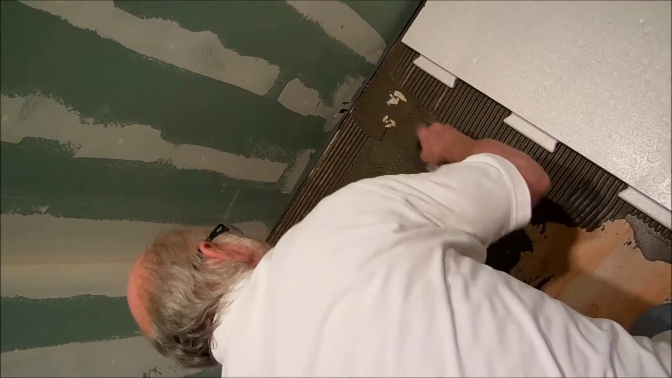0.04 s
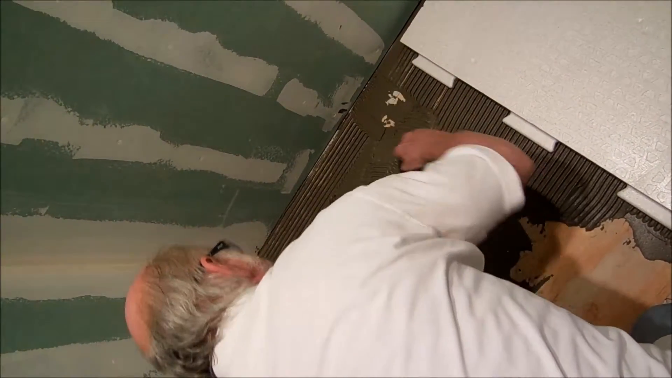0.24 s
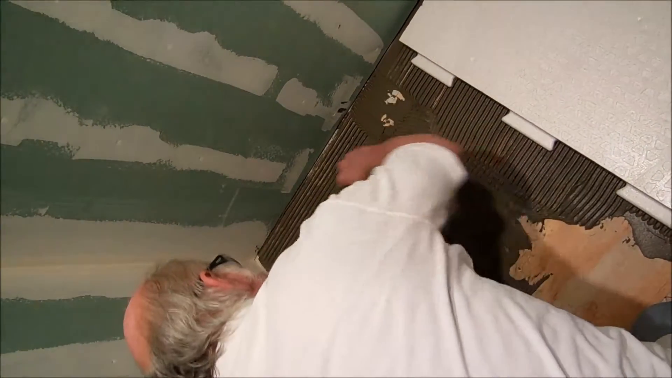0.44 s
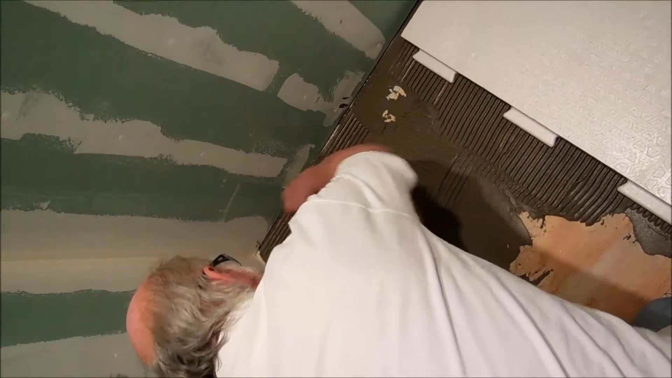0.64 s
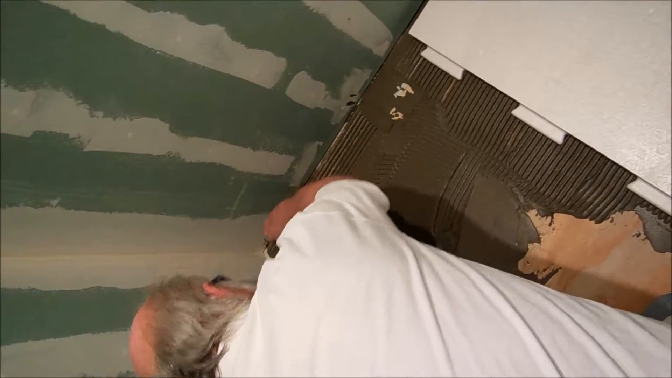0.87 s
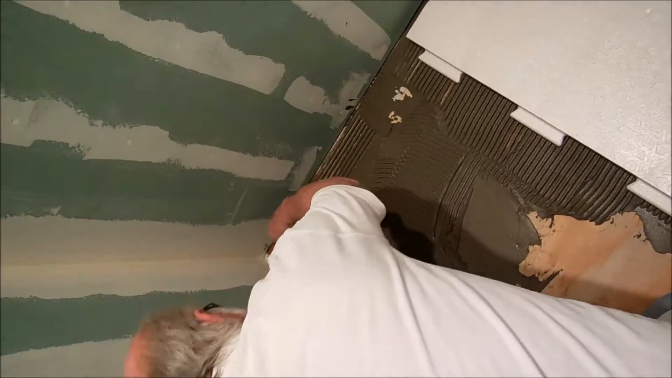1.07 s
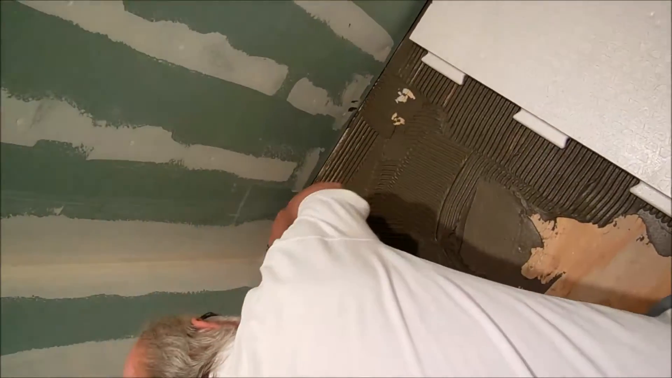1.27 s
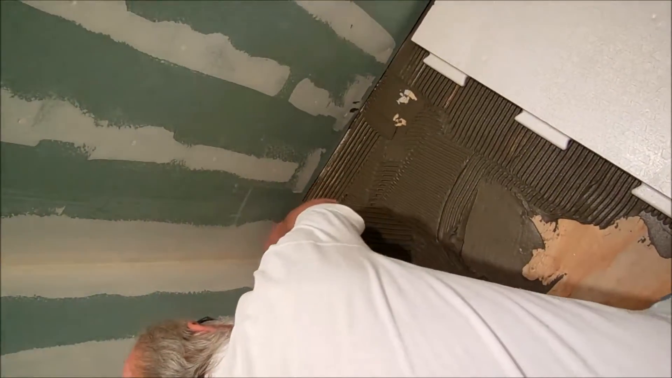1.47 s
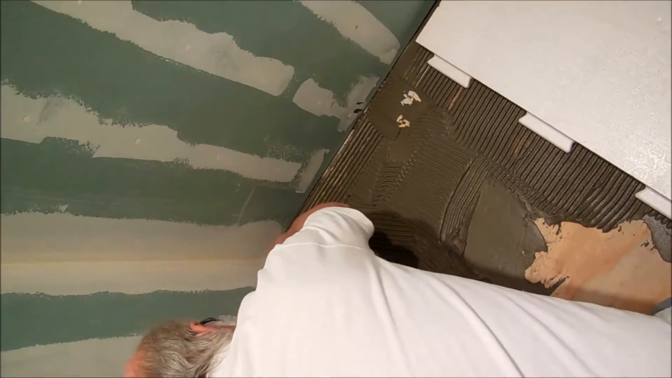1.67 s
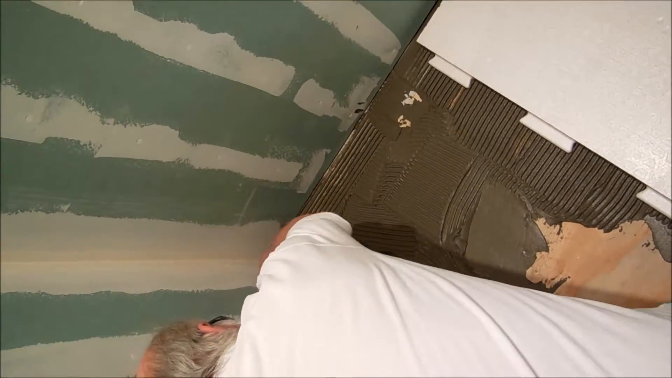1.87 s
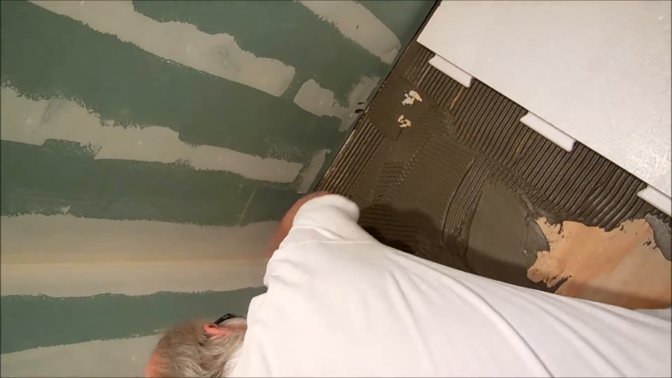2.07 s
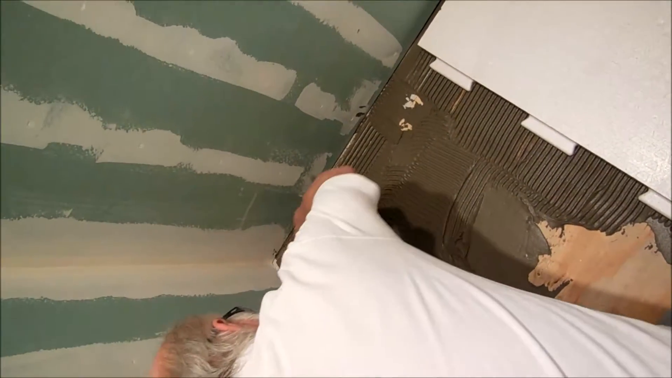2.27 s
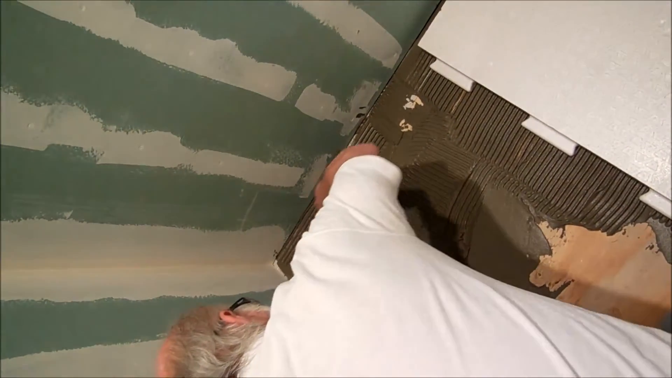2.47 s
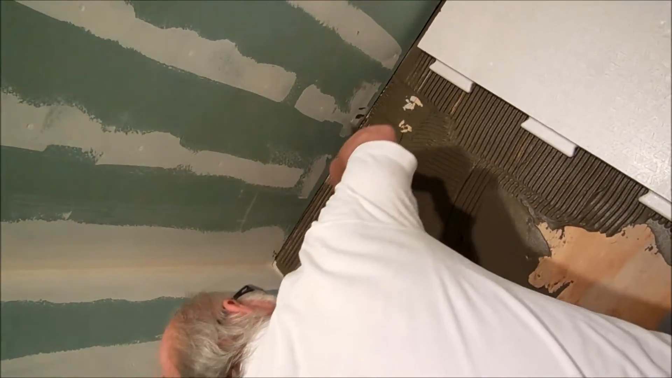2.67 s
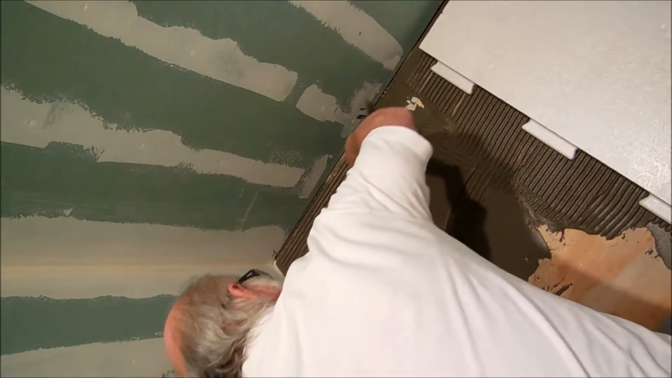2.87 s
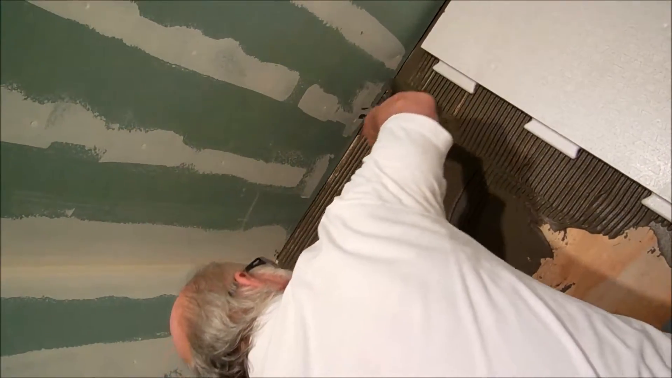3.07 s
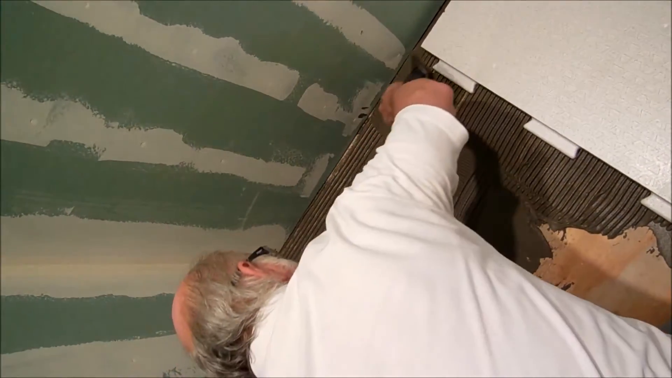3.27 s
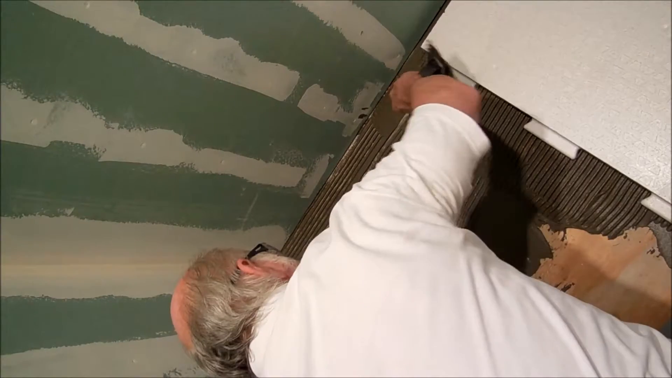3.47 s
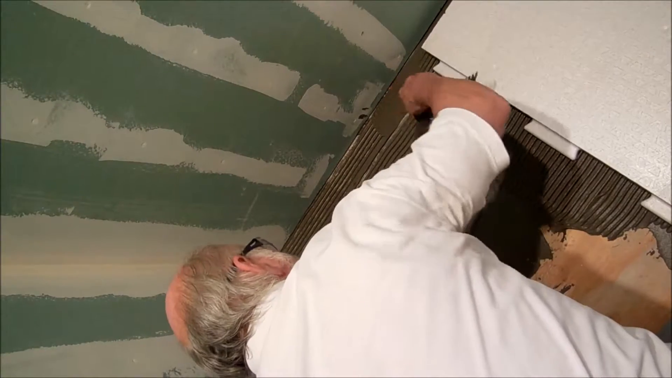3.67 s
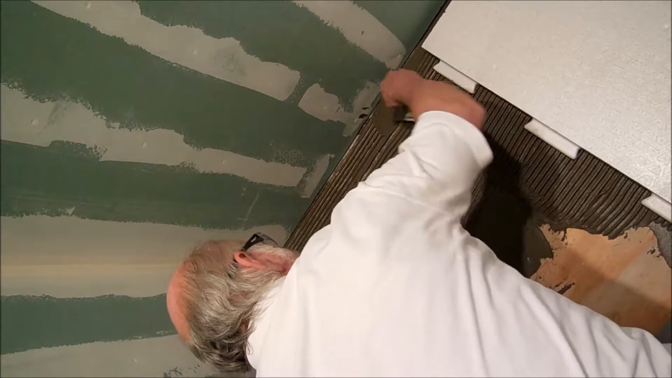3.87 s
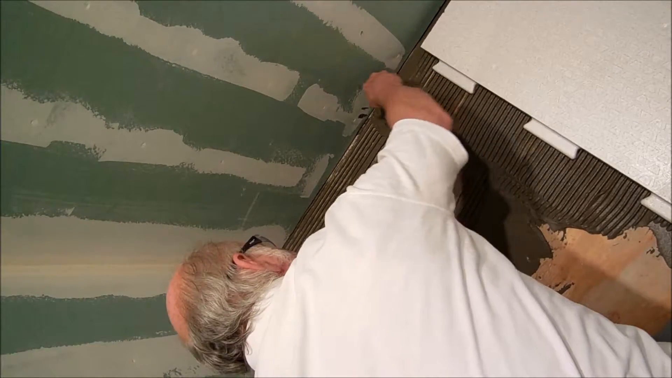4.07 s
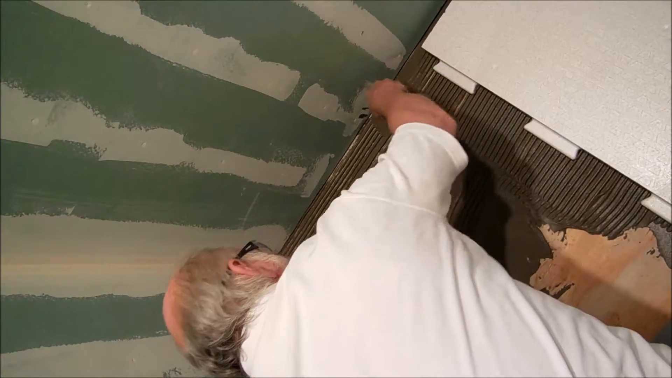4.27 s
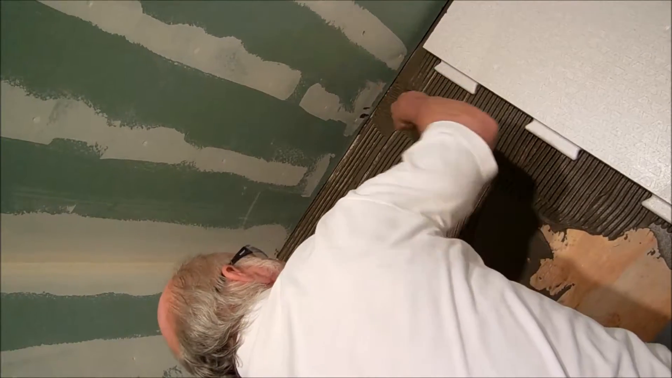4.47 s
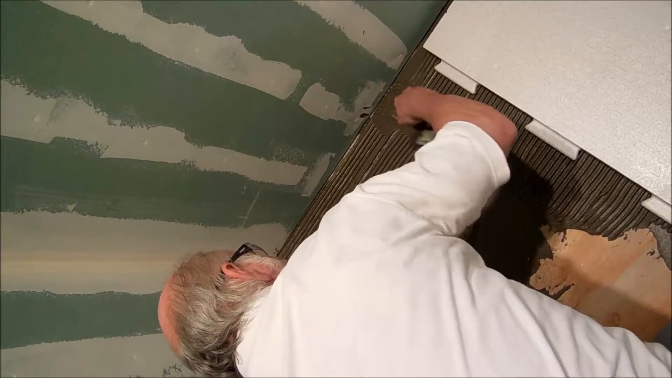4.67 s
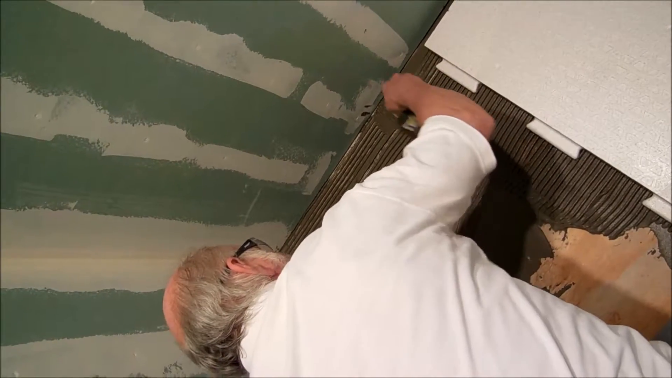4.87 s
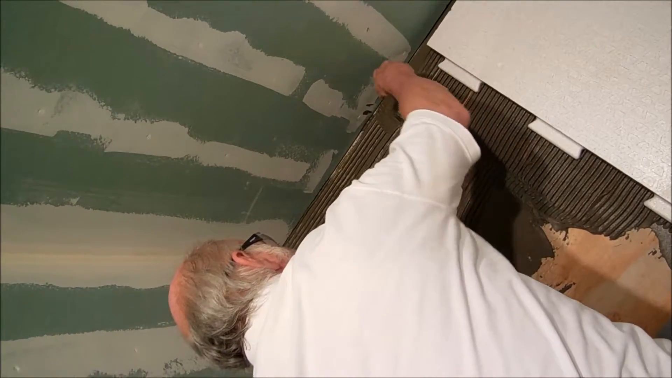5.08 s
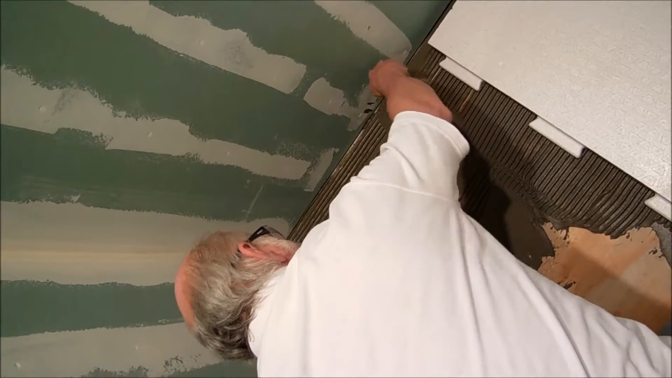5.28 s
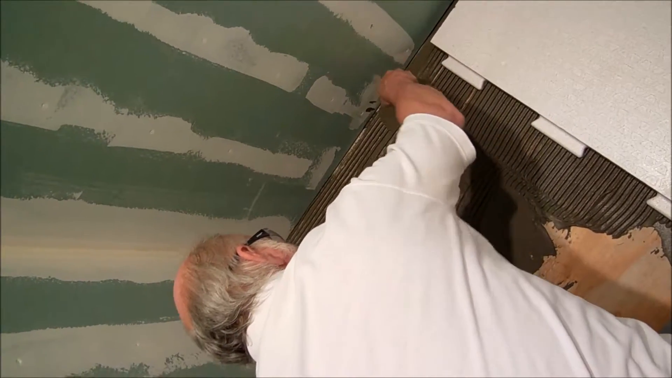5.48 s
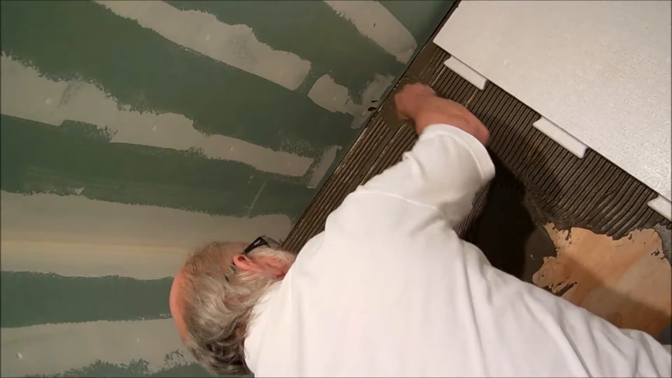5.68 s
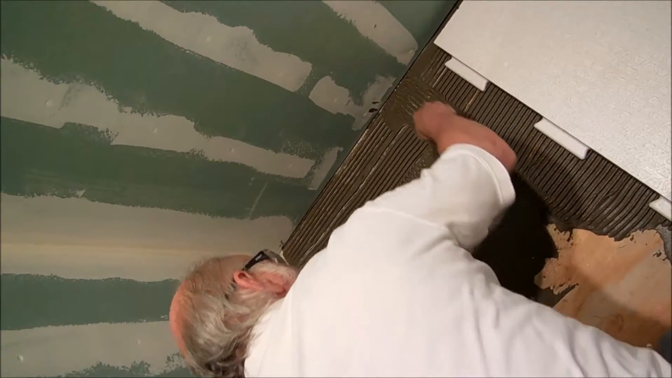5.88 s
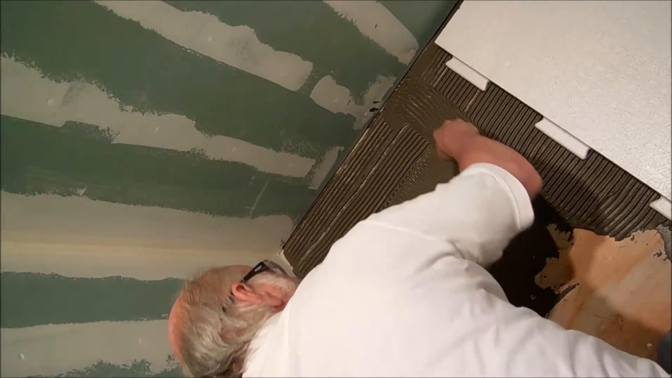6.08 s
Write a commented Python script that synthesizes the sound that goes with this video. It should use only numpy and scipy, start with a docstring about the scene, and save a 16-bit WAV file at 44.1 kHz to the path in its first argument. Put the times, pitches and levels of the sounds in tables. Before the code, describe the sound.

A notched trowel rasps through gritty mortar in one long scrape, with short clicks, pauses and a closing scrape in a small bare stall.

```python
"""A notched steel trowel combs sandy mortar over a wooden subfloor in a bare shower stall.
Sand crushed under the teeth hisses, made of random clicks; the same kind of clicks, sent
through resonances, make the blade rasp and the floor drum. Between strokes the blade skims
the wet surface as soft noise and touches down in short bursts. Small pops, a soft thud,
the ringing of the close walls and quiet room air complete the scene."""
import sys
import numpy as np
from scipy import signal
from scipy.fft import rfft, irfft, next_fast_len
from scipy.io import wavfile
from scipy.ndimage import map_coordinates

SR = 44100
rng = np.random.default_rng(int(sys.argv[2]) if len(sys.argv) > 2 else 0)


def to_wav(s):
    """Save 16-bit WAV."""
    ch = np.atleast_2d(s).T  # columns
    pcm = np.round(np.clip(ch, -1, 1) * 32767)  # PCM
    wavfile.write(sys.argv[1], SR, pcm.astype(np.int16))


N = 270333

# Levels of events are set before the layers are balanced and the walls answer.
# Strokes of the trowel. Each row: start in seconds, length in seconds, crushed sand in dB,
# drag on the floor in dB, blade rasp in dB, easing off in dB per second.
STROKES = [(-.04, 0.051, -21, -32.5, -25.5, 2), (1.963, 0.072, -37.5, -48.5, -42, 24),
           (2.06, 1.307, -32, -36, -47, 2.5), (3.386, 0.072, -37.5, -38.5, -66, 7),
           (3.48, 0.052, -33.5, -34, -67, 0), (4.321, 0.18, -23.5, -28.5, -34.5, 0.5),
           (5.504, 1, -32.5, -37, -52.5, 4)]
# Thicker heaps that the teeth plough through. Each row: middle in seconds, spread in seconds,
# extra sand in dB, extra drag in dB.
HEAPS = [(2.069, 0.022, 14.5, 2.5), (2.126, 0.029, 7, 10), (2.39, 0.022, 4, 5), (2.694, 0.015, 5, 2),
         (2.75, 0.0096, 4.5, 5.5), (3.012, 0.03, 7.5, 5.5), (3.106, 0.01, 4, 5.5), (5.6, 0.041, 7.5, 8),
         (5.702, 0.027, 8, 12), (5.824, 0.018, 3.5, 8.5), (6, 0.039, 2, 1)]
# Light passes over the wet surface. Each row: start in seconds, length in seconds,
# level in dB, brightness in dB per octave.
SKIMS = [(.45, 0.35, -59.5, -1), (1.349, 0.035, -52.5, 3.5), (1.885, 0.042, -47.5, 6)]
# The blade touches down. Each row: time in seconds, tick in dB, knock in dB.
TOUCHES = [(1.002, -54, -58), (1.916, -75, -46.5), (1.99, -54, -52), (2.442, -43, -35),
           (4.289, -47.5, -51.5), (4.323, -31.5, -51), (4.492, -32, -34), (5.48, -44, -48),
           (5.527, -41, -48)]
# The teeth chatter at one pitch of blade or board. Each row: middle in seconds,
# spread in seconds, pitch in Hz, level in dB over the drag.
CHATTER = [(2.236, .043, 396, -2), (2.56, 0.23, 1030, -6.5), (3.1, 0.076, 830, -3), (4.414, 0.048, 530, -4),
           (4.493, 0.024, 860, -2), (5.648, 0.075, 1250, -3.5)]

# Tone of crushed sand. Each row: frequency in Hz, relative level in dB per Hz.
SAND_SPECTRUM = [(150, -19.5), (600, -4.5), (1500, -2), (2800, -1), (4000, -1), (5500, -3), (8000, -1.5),
                 (10500, 0), (14500, -1.5), (16000, -6.5)]
# Broad tone of the damped board. Each row: frequency in Hz, relative level in dB per Hz.
BOARD_SPECTRUM = [(40, -47.5), (100, -36), (145, -6), (200, -14), (300, -3.5), (500, 1.5), (850, -7),
                  (1300, -11), (2200, -27.5), (5000, -44)]
# Tone of the wet surface before brightening. Each row: frequency in Hz, relative level in dB per Hz.
WET_SPECTRUM = [(300, -16), (2500, -14), (5500, -8.5), (8000, -9.5), (12000, -2.5), (14000, -10),
                (16000, -26)]
# Tone of still room air. Each row: frequency in Hz, relative level in dB per Hz.
AIR_SPECTRUM = [(12, -19), (20, -1), (44, 2.5), (65, -12), (285, -14), (642, -20), (1030, -19),
                (1570, -19.5), (3950, -25), (4300, -23.5), (16000, -24.5)]

# Resonances of the floor. Each row: frequency in Hz, width in Hz, relative level in dB.
FLOOR_MODES = [(153.5, 17.5, 1.5), (282, 21, 0), (354, 38, 0), (380, 71, -14.5), (535, 84, 3),
               (730, 57, 2.5), (800, 72, -13)]
# Resonances of the blade. Each row: frequency in Hz, width in Hz, relative level in dB.
BLADE_MODES = [(1150, 140, -2.5), (1333, 290, 2.5), (1716, 69, -25), (2000, 210, -9.5)]
# The whole blade flexing. Each row: frequency in Hz, width in Hz for one pass, level in dB.
RASP_MODE = [(1624, 1180, 0)]

# Fading of the late tail in the stall. Each row: frequency in Hz, seconds to fall by 60 dB.
STALL_FADE = [(120, 0.61), (400, 0.53), (800, 0.57), (1400, 0.66), (3000, 0.52), (6000, 0.56),
              (12000, 0.35)]
# Start of the late tail. Each row: frequency in Hz, level in dB against the early burst.
LATE_TAIL = [(150, -10.5), (500, -14.5), (1000, -11), (1700, -15), (3000, -15), (10000, -15.5)]
# Likeness of left and right. Each row: frequency in Hz, correlation from -1 to 1.
LIKENESS = [(30, 0.94), (60, 0.24), (130, 0.68), (300, 0.66), (600, 0.75), (1000, 0.44), (2000, 0.17),
            (4000, -0.13), (12000, -0.032)]
# Balance of the work between the sides. Each row: frequency in Hz, left minus right in dB.
SIDE_BALANCE = [(130, -1.5), (250, -1), (500, -3.5), (1000, -3.5), (4000, -5.5), (8000, -5.5),
                (10500, -5.5), (13000, -2), (16000, 2)]

# Time constants: sand cracks first, then the teeth sink to the floor; both stop as the blade lifts.
BITE_S, SINK_S, RELEASE_S = 0.027, 0.042, 0.014
SKIM_ATTACK_S, SKIM_RELEASE_S = 0.02, 0.021
RASP_GROWS = 1.46  # dB of rasp for each dB that a heap adds, averaged over sand and drag
CHATTER_Q = 5  # pitch over width, for one pass of the resonance
TOP_HZ = 16000


def amp(db):
    """Turn decibels into a gain."""
    return 10 ** (np.asarray(db) / 20)


def unit(x):
    """Scale to an average strength (rms) of 1."""
    return x / np.sqrt(np.mean(x ** 2) + 1e-20)


def along(points, hz):
    """Read a table of (Hz, value) between its points, on a log frequency axis."""
    f, value = np.transpose(points)
    return np.interp(np.log(hz + 1), np.log(f + 1), value)


def wobble(rate):
    """A random curve that takes about `rate` new values a second."""
    knots = rng.standard_normal(int(N * rate / SR) + 4)
    return map_coordinates(knots, [np.arange(N) * rate / SR])


def filtered(x, response):
    """Multiply the spectrum of x by a response that depends on frequency."""
    size = next_fast_len(N + SR // 2)
    hz = np.fft.rfftfreq(size, 1 / SR)
    return irfft(rfft(x, size) * response(hz), size)[..., :N]


def coloured(x, spectrum, size=2048):
    """Give x a tone with a filter that acts only forward in time, so clicks keep sharp fronts."""
    level = amp(along(spectrum, np.fft.rfftfreq(size, 1 / SR)))
    cepstrum = irfft(np.log(level))
    # Folding the cepstrum forward gives the filter its least possible delay.
    cepstrum[1:size // 2] *= 2
    cepstrum[size // 2 + 1:] = 0
    impulse = irfft(np.exp(rfft(cepstrum)))
    return signal.fftconvolve(x, impulse)[:N]


def ringing(x, modes):
    """Excite a set of resonances with x: each one rings at its pitch, longer if it is narrow."""
    def response(f):
        return sum(amp(db) * 1j * f * width / (hz * hz - f * f + 1j * f * width)
                   for hz, width, db in modes)
    return filtered(x, response)


def grains(rate, spread_db):
    """Random clicks, about `rate` a second; their sizes are limited, as sifted sand has no huge grains."""
    struck = rng.random(N) < rate / SR
    size = amp(spread_db * np.clip(rng.standard_normal(N), -2, 2))
    return unit(struck * size * rng.choice([-1, 1], N))


def two_ports(pair):
    """Mix two unrelated signals into left and right with the likeness wanted at each frequency."""
    def shares(hz):
        turn = np.arccos(np.clip(along(LIKENESS, hz), -1, 1)) / 2
        return np.array([np.cos(turn), np.sin(turn)])
    mid, side = filtered(pair, shares)
    return np.array([mid + side, mid - side])


def contact(start, length, attack, release):
    """Attack, hold and release of one pass of the blade."""
    t = np.arange(N) / SR - start
    rise = 1 - np.exp(-np.maximum(t, 0) / attack)
    fall = np.exp(-np.maximum(t - length, 0) / release)
    return rise * fall


def swell(middle, spread):
    """A bell curve of height 1 around one moment."""
    return np.exp(-.5 * ((np.arange(N) / SR - middle) / spread) ** 2)


def pressure(waver_db=0.09, waver_rate=16):
    """Gains of crush, drag and rasp: each stroke bites, eases off and lifts, and swells in the heaps."""
    t = np.arange(N) / SR
    gains = np.zeros((3, N))
    for start, length, sand_db, drag_db, rasp_db, easing in STROKES:
        bite = contact(start, length, BITE_S, RELEASE_S)
        sink = contact(start, length, SINK_S, RELEASE_S)
        eased = amp(-easing * np.clip(t - start, 0, length))
        gains += eased * np.array([amp(sand_db) * bite, amp(drag_db) * sink, amp(rasp_db) * sink])
    more_sand, more_drag = np.zeros(N), np.zeros(N)
    for middle, spread, sand_db, drag_db in HEAPS:
        heap = swell(middle, spread)
        more_sand += sand_db * heap
        more_drag += drag_db * heap
    more_rasp = RASP_GROWS * (more_sand + more_drag) / 2
    waver = waver_db * wobble(waver_rate)
    return gains * amp(np.array([more_sand, more_drag, more_rasp]) + waver)


def subfloor(force, modes_db=-4, lowest_hz=135):
    """The damped board answers broadly, a few low modes stand out, and the modes give no deep bass."""
    modes = filtered(ringing(force, FLOOR_MODES), lambda f: 1 / np.sqrt(1 + (lowest_hz / (f + 1)) ** 10))
    return unit(unit(coloured(force, BOARD_SPECTRUM)) + amp(modes_db) * unit(modes))


def scraping(sand_db=-1, drum_db=-3.0, blade_db=-16, judder_db=1.4):
    """Sand cracks under the teeth; coarser grains catch them and shake blade and floor."""
    crush, drag, flex = pressure()
    judder = amp(judder_db * np.clip(wobble(130), -2, 2))  # the teeth stick and slip unevenly
    sand = crush * unit(coloured(grains(rate=6500, spread_db=8.0), SAND_SPECTRUM))
    drum = drag * subfloor(grains(rate=500, spread_db=3.0))
    slips = grains(rate=1500, spread_db=2)
    blade = drag * unit(ringing(slips, BLADE_MODES))
    # Two passes make the flexing tone stand out more.
    rasp = flex * unit(ringing(ringing(slips, RASP_MODE), RASP_MODE))
    layers = amp(sand_db) * sand + amp(drum_db) * drum + amp(blade_db) * blade + rasp
    return judder * layers + drag * chatter()


def stall(x, direct_db=-7, walls_db=-1, early_t60=0.18, size=1024, count=8):
    """The close walls answer with a dense early burst and a weaker tail, varying along the blade."""
    hz, t, noise = signal.stft(rng.standard_normal((count, 2, SR // 2)), SR, nperseg=256)
    early = amp(-60 * t / early_t60)
    late = amp(along(LATE_TAIL, hz)[:, None] - 60 * t / along(STALL_FADE, hz)[:, None])
    decay = np.hypot(early, late)
    decay = decay / np.linalg.norm(decay, axis=1, keepdims=True)
    tails = signal.istft(noise * decay, SR, nperseg=256)[1]
    walls = np.zeros((2, N))
    # Overlapping pieces, `size` samples long, take turns at `count` spots with their own echoes.
    for spot, tail in enumerate(tails):
        turn = (np.arange(N) / (size / 2) - spot) % count
        piece = x * np.sin(np.pi / 2 * turn) * (turn < 2)
        echo = tail / np.linalg.norm(tail[0])
        walls += signal.fftconvolve(piece[None], echo, axes=1)[:, :N]
    return amp(direct_db) * x + amp(walls_db) * two_ports(walls)


def room_air(level_db=-62.0):
    """Low building rumble and faint hiss, shaped from steady noise."""
    air = filtered(rng.standard_normal((2, N)), lambda hz: amp(along(AIR_SPECTRUM, hz)))
    return amp(level_db) * unit(two_ports(air))


def wet_ticks(level_db=-81, hz=3900, width_hz=400):
    """Tiny air pockets pop in the worked mortar, each a click with a short ring."""
    pops = grains(rate=4, spread_db=0)
    return amp(level_db) * unit(ringing(pops, [(hz, width_hz, 0)]))


def skimming():
    """Barely loaded, the blade gives only a fine wet hiss."""
    out = np.zeros(N)
    for start, length, db, brightness in SKIMS:
        spectrum = [(hz, level + brightness * np.log2(hz / 1000)) for hz, level in WET_SPECTRUM]
        hiss = unit(coloured(rng.standard_normal(N), spectrum))
        out += amp(db) * contact(start, length, SKIM_ATTACK_S, SKIM_RELEASE_S) * hiss
    return out


def touches(tick_t60=0.19, knock_t60=0.15, blade_db=-2, rise=0.00071):
    """Each touch crushes a pinch of sand and knocks blade and floor, cushioned by the mortar."""
    t = np.arange(N) / SR
    cushion = 1 - np.exp(-t / rise)  # rise is in seconds
    tick, knock = np.zeros(N), np.zeros(N)
    for s, tick_db, knock_db in TOUCHES:
        start = round(s * SR)
        tick[start:] += (cushion * amp(tick_db - 60 * t / tick_t60))[:N - start]
        knock[start:] += (cushion ** 2 * amp(knock_db - 60 * t / knock_t60))[:N - start]
    force = rng.standard_normal(N)
    body = subfloor(force) + amp(blade_db) * unit(ringing(force, BLADE_MODES))
    return tick * unit(coloured(force, SAND_SPECTRUM)) + knock * body


def lean_on_floor(middle=2.095, spread=0.043, hz=48, db=-55):
    """The joists give a soft low thud as the weight goes onto the trowel."""
    tone = np.sin(2 * np.pi * hz * (np.arange(N) / SR - middle))
    return amp(db) * swell(middle, spread) * tone


def chatter():
    """Stick and slip feeds one resonance for as long as the angle and pressure suit it."""
    out = np.zeros(N)
    slips = grains(rate=1500, spread_db=2)
    for middle, spread, hz, db in CHATTER:
        mode = [(hz, hz / CHATTER_Q, 0)]
        tone = unit(ringing(ringing(slips, mode), mode))
        out += amp(db) * swell(middle, spread) * tone
    return out


def scene():
    """Put the work and its echoes mostly to the right, then add the thud and the room air."""
    work = stall(scraping() + skimming() + touches() + wet_ticks())
    sides = np.array([[1], [-1]])  # left gets half the difference, right loses it
    placed = filtered(work, lambda hz: amp(sides * along(SIDE_BALANCE, hz) / 2))
    return placed + lean_on_floor() + room_air()


def record(dry):
    """Keep only the sound below the top frequency."""
    return filtered(dry, lambda hz: hz < TOP_HZ)


dry = scene()
out = record(dry)
to_wav(out)
```